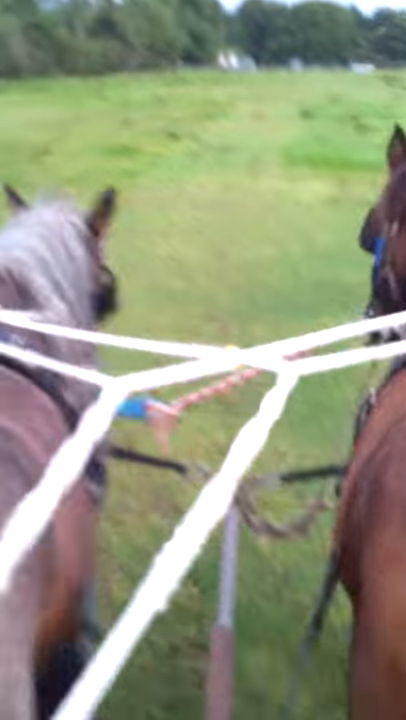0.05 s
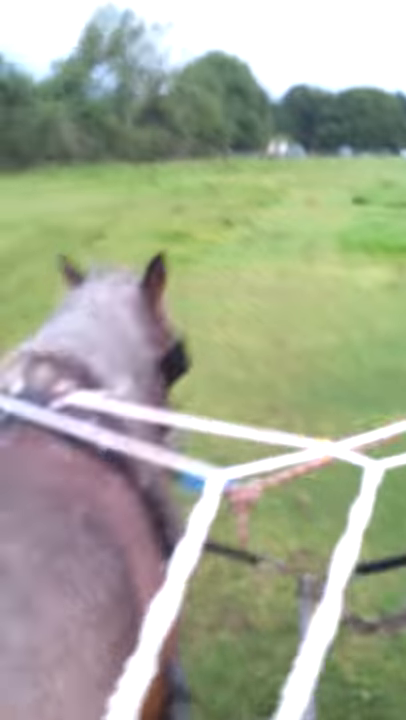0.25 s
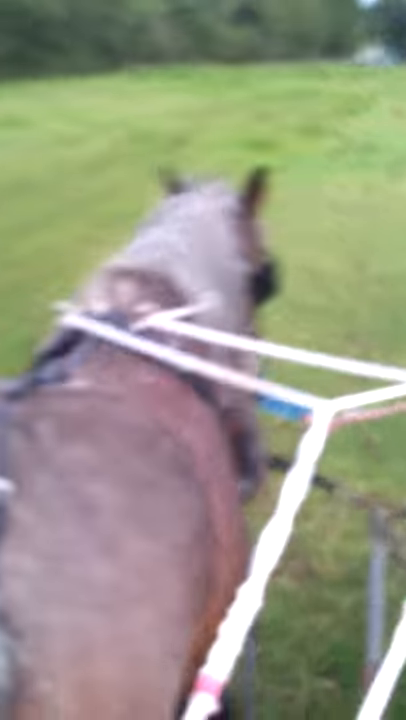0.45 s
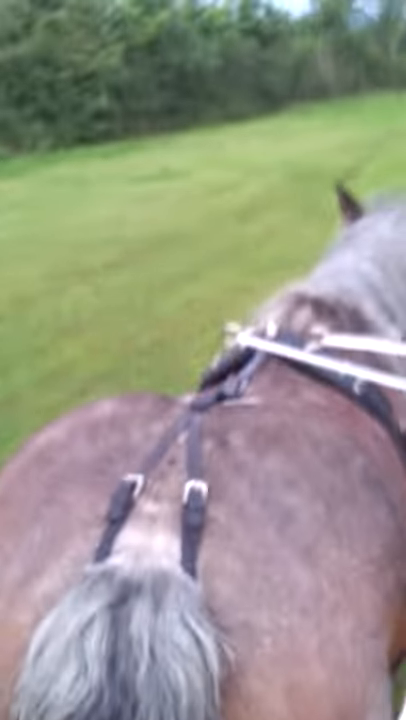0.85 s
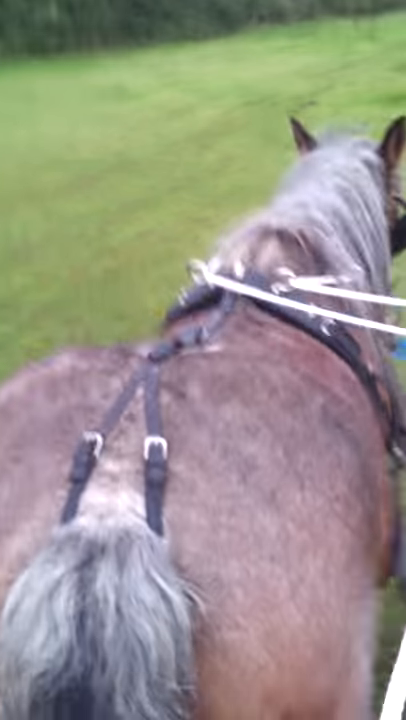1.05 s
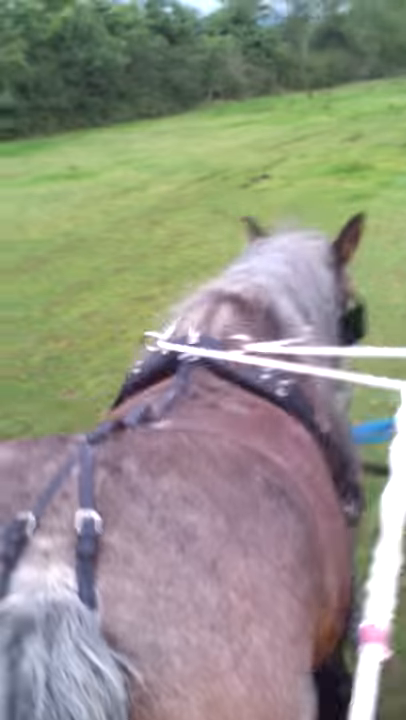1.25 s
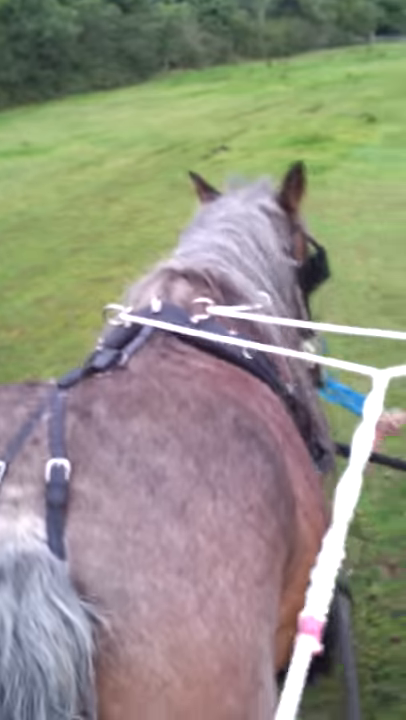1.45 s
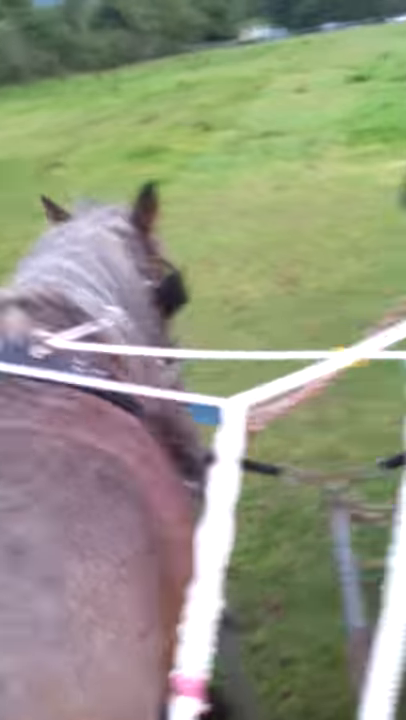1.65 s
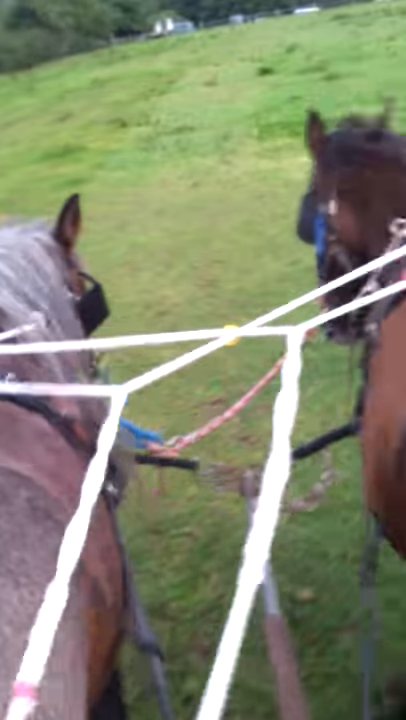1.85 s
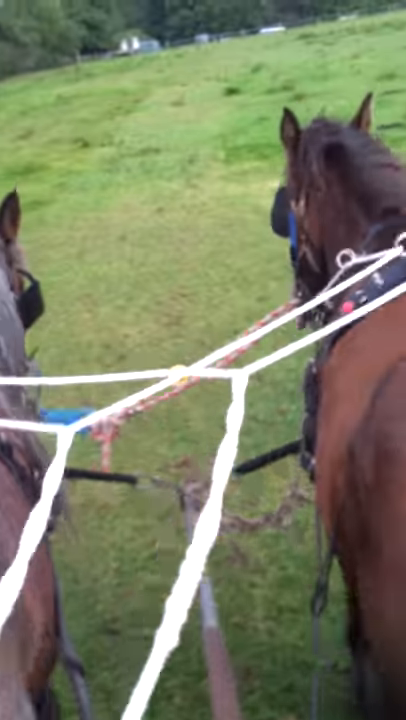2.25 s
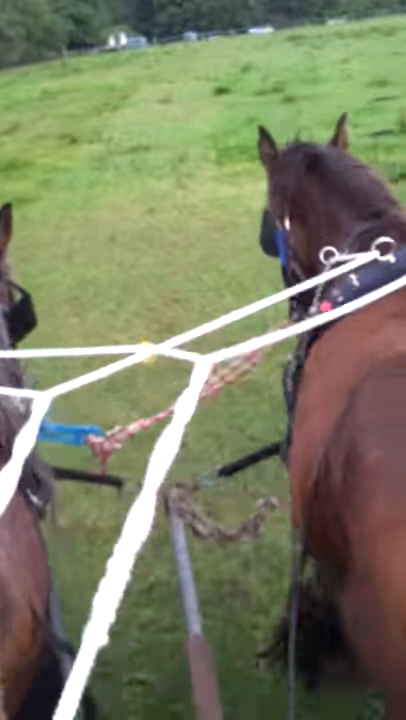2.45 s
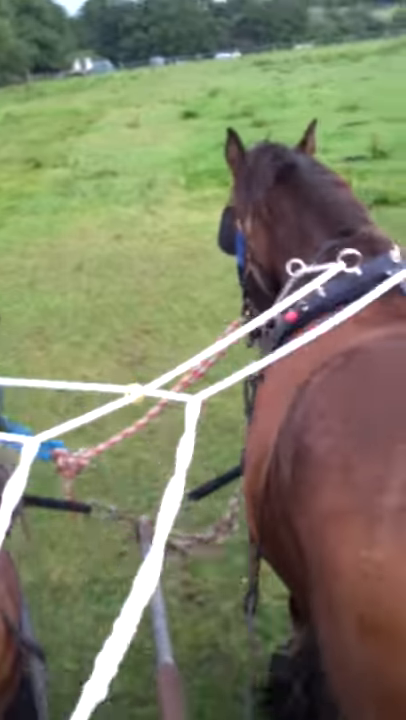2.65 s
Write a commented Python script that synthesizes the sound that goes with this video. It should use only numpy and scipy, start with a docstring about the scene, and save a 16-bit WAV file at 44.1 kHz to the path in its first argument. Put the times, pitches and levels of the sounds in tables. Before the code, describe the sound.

Horse-drawn chain harrow dragging through grass, its hitch clanking and squeaking as wind hits the microphone.

```python
"""Horses pulling a chain harrow

Two horses walk over a pasture, drawing the harrow from a steel hitch cart, heard from the seat.
The chain mat rustles through the grass, hooves thud, and impacts set the frame and links ringing.
Once a hitch joint judders and slams, overloading the microphones; later dry joints squeak
and turbulent wind buffets the port of the left microphone."""
import sys
import numpy as np
from scipy import signal
from scipy.fft import rfft, irfft, next_fast_len
from scipy.io import wavfile
from scipy.ndimage import uniform_filter1d, map_coordinates

SR = 44100
rng = np.random.default_rng(int(sys.argv[2]) if len(sys.argv) > 2 else 0)


def put_to_file(sound):
    """Save the sound as 16-bit audio at rate SR, in the file named by the first command-line argument."""
    columns = np.atleast_2d(sound).T  # one column per channel
    safe = np.clip(columns, -1, 1)
    whole_steps = np.round(safe * 32767)
    wavfile.write(sys.argv[1], SR, whole_steps.astype(np.int16))


N = 123479

# drag of the mat through the grass (t/s, level/dB)
DRAG_LEVELS = [(0.0, -32), (0.106, -36), (0.186, -32.5), (0.21, -39.5), (0.31, -34), (0.5, -37),
               (0.57, -31), (0.59, -39), (0.77, -32), (0.8, -43.5), (0.81, -33.5), (0.92, -30),
               (1.06, -36.5), (1.09, -32.5), (1.32, -29.5), (1.41, -34.5), (1.42, -30), (1.47, -37),
               (1.51, -32.5), (1.54, -38.5), (1.56, -40), (1.6, -31.5), (1.65, -38), (1.7, -33.5),
               (1.73, -35), (1.83, -30), (1.86, -35.5), (2.1, -27.5), (2.19, -35.5), (2.25, -27.5),
               (2.29, -38.5), (2.32, -28.5), (2.37, -36.5), (2.38, -26.5), (2.46, -32), (2.47, -40),
               (2.51, -29.5), (2.54, -43.5), (2.57, -32), (2.67, -40), (2.68, -33.5), (2.8, -35)]
# flicking blades (f/Hz, level/dB)
GRASS_SPECTRUM = [(300, -22), (1000, -8), (1600, -5), (2500, -10), (3400, -4), (4400, -5.5), (5600, -2.5),
                  (7000, -1.5), (9700, -8), (12000, -10.5), (13700, -16), (15000, -35)]
# stems snap and links tick (t/s, level/dB)
SNAPS = [(.6054, -37), (.7371, -25), (.8079, -27), (1.092, -32), (1.1925, -26), (1.285, -29), (1.314, -29),
         (1.424, -30), (1.4859, -29), (1.5138, -26), (1.602, -33), (1.7533, -32), (1.9348, -30),
         (2.5629, -33)]
# snaps and ticks (f/Hz, level/dB)
SNAP_SPECTRUM = [(400, -20), (1500, -11), (4000, -3), (7000, 7), (11000, 7), (14500, -9)]
# rattle of the rolling frame (t/s, level/dB)
ROLL_LEVELS = [(0.62, -48), (0.882, -42.5), (1.04, -46), (1.136, -39), (1.194, -45), (1.208, -39),
               (1.678, -44), (1.84, -38.5), (1.864, -46), (2.094, -37), (2.19, -48.5), (2.244, -35.5),
               (2.292, -41), (2.34, -37.5), (2.55, -44.5), (2.8, -45.5)]
# rolling frame (f/Hz, level/dB)
ROLL_SPECTRUM = [(50, -40), (90, -16), (170, -6.5), (270, -1), (345, 3), (450, -0.5), (640, -1.5), (760, 3),
                 (900, -2), (1150, -3.5), (1700, -11), (2600, -4), (5000, -21.5)]
# faint buffeting on both ports (t/s, level/dB)
BREEZE_LEVELS = [(0, -46.5), (.1, -50), (.25, -37), (.45, -56), (.6, -48), (1.0, -49.5), (1.3, -62),
                 (1.9, -57), (2.15, -42.5), (2.4, -58), (2.8, -46.5)]
# rumble of light air (f/Hz, level/dB)
BREEZE_SPECTRUM = [(25, -35), (60, -3.5), (140, -3), (220, -2), (500, -28), (1500, -55)]
# hoof thuds on turf (t/s, f/Hz, level/dB, left minus right/dB)
HOOF_FALLS = [(.002, 172, -37.5, -21), (.175, 198, -28.5, -13), (.285, 329.7, -17.5, 0),
              (.318, 351.6, -23, 3), (1.215, 354, -35, 0), (1.308, 346, -25.5, -2),
              (1.527, 342.5, -26.5, 2), (1.692, 259, -37, -16), (2.079, 297, -35, -8)]
# light knocks in the frame (t/s, ring level/dB, rattle level/dB)
FRAME_KNOCKS = [(.088, -38, -36), (.118, -40.5, -34), (.328, -31.5, -24.5), (.579, -38.5, -42),
                (1.125, -62, -28.5), (1.212, -43, -25.5), (1.24, -55, -46), (1.487, -40.5, -30.5),
                (2.092, -47, -48), (2.228, -48, -32), (2.241, -44, -32), (2.33, -45, -33),
                (2.435, -42, -48)]
# modes of the steel frame (f/Hz, level/dB, T60/s)
FRAME_MODES = [(387, -14, 0.38), (612.6, -7, 0.25), (630, 10.5, 0.054), (642, -10.5, 0.85), (731, -7, 0.51),
               (814, -3.5, 0.75), (848, -2, 0.41), (985, -5.5, 0.27), (1049, 4, 0.18), (1240, 2, 0.3),
               (1634, 6, 0.17), (1904, -0.5, 0.34), (2208, -22.5, 0.31), (2646, 1, 0.098),
               (2825, -10, 0.32), (2915, -13.5, 0.36), (3664, -3.5, .13), (4274, -2, 0.18), (4754, 4, 0.15)]
# tones of the slipping joint (f/Hz, level/dB, swell time/s)
JOINT_TONES = [(845, -1.5, 0.0015), (1011, 0.5, .0017), (2728, -17.5, 0.0031)]
# impacts in the hitch and frame (f/Hz, level/dB)
IMPACT_SPECTRUM = [(150, -46), (350, -11), (620, 3), (1300, 2), (2200, 0.5), (2800, -0.5), (4500, -5),
                   (7000, -7.5), (10000, -18.5), (15000, -29)]
# clatter after the slam (f/Hz, level/dB)
TAIL_SPECTRUM = [(60, -40), (170, -1.5), (330, -1.5), (500, 2), (800, 8.5), (1200, 0), (1900, -3.5),
                 (2300, -16), (2900, -8), (5000, -14), (12000, -49)]
# chain links clink (t/s, f/Hz, level/dB)
LINK_CLINKS = [(0.467, 2960, -26), (1.192, 3890, -18.5), (1.195, 3430, -28.5), (1.329, 5880, -26.5),
               (1.599, 5450, -31)]
# wind on the left port (t/s, level/dB)
WIND_LEVELS = [(0, -56.5), (.5, -47), (.6, -30), (.76, -50), (1.93, -59.5), (2.005, -22.5), (2.07, -35),
               (2.17, -24.5), (2.24, -44), (2.34, -45.5), (2.388, -15.5), (2.415, -16.5), (2.455, -16),
               (2.474, -7), (2.497, -23), (2.58, -25.5), (2.675, -26.5), (2.71, -36.5), (2.8, -48)]
# turbulence at the port (f/Hz, level/dB)
WIND_SPECTRUM = [(25, -27), (70, -22), (130, 2.5), (250, 3.5), (360, -7.5), (550, -11), (900, -24),
                 (1600, -33), (4000, -73)]
# sharp eddies that strike the port (t/s, f/Hz, level/dB)
WIND_EDDIES = [(2.0049, 413, -6.5), (2.389, 258, -4), (2.405, 343, -3), (2.439, 396, -5), (2.461, 292, 5.5),
               (2.4727, 400, 7.5), (2.4778, 261, 9), (2.488, 288, -1.5), (2.505, 443, -11.5),
               (2.524, 680, -12), (2.547, 322, -11.5), (2.601, 330, -16.5), (2.678, 288, -13.5)]
# dry joints squeak (t/s, f/Hz, level/dB, relative level of second harmonic/dB)
JOINT_CREAKS = [(1.78, 760, -33, -14), (1.83, 760, -38, -14), (2.035, 770, -34, -14),
                (2.105, 755, -35, -14), (2.243, 640, -27.5, 7.5), (2.335, 770, -35, -12),
                (2.625, 760, -35, -14)]

PORT_LAG_S, SHORT_LAG_S = 0.00033, 0.0001  # delays of the right channel
FRAME_PAN_DB = 2  # left minus right


def undb(db):
    return np.exp(np.asarray(db) * np.log(10) / 20)


def unit_rms(x):
    return x / np.sqrt(np.mean(x ** 2))


def clock():
    return np.arange(N) / SR


def envelope(rows):
    """Amplitude envelope through (t/s, level/dB) points."""
    return undb(np.interp(clock(), *np.array(rows).T))


def colour(x, spectrum):
    """Linear filtering by (f/Hz, level/dB) points, scaled to unit rms."""
    hz, db = np.array(spectrum).T
    size = next_fast_len(N, real=True)
    f = np.maximum(np.fft.rfftfreq(size, 1 / SR), 1)
    skirt = np.minimum(f / hz[0], 1) ** 2
    gain = undb(np.interp(np.log(f), np.log(hz), db))
    return unit_rms(irfft(rfft(x, size) * skirt * gain, size)[:N])


def noise(spectrum):
    return colour(rng.standard_normal(N), spectrum)


def wander(per_s):
    """Smoothed random steps give a slow fluctuation with a spread near 1."""
    hold = int(SR / per_s)
    steps = rng.standard_normal(2000)[np.arange(N) // hold]
    return 1.3 * uniform_filter1d(uniform_filter1d(steps, hold), hold)


def decay(peak_s, t60, rise_s=0.00025):
    """Exponential growth up to the peak, then exponential decay."""
    age = clock() - peak_s
    live = (age > -8 * rise_s) & (age < 2 * t60)
    out, t = np.zeros(N), age[live]
    out[live] = np.exp(np.minimum(t, 0) / rise_s - np.log(1000) * np.maximum(t, 0) / t60)
    return out


def ring(start, modes, attack_s=0.00098):
    """Free vibration of a struck body: a sum of damped modes (f/Hz, level/dB, T60/s)."""
    age = clock() - start
    live = (age > 0) & (age < 0.6)
    out, t = np.zeros(N), age[live]
    for hz, db, t60 in modes:
        out[live] += undb(db) * np.sin(2 * np.pi * hz * t) * np.exp(-np.log(1000) * t / t60)
    out[live] *= 1 - np.exp(-t / attack_s)
    return out


def sides(pan_db):
    return undb(np.array([[pan_db], [-pan_db]]) / 2)


def ports(x, pan_db=FRAME_PAN_DB, lag_s=PORT_LAG_S):
    """Path difference: the sound reaches the left microphone port first."""
    delayed = map_coordinates(x, [np.arange(N) - lag_s * SR])
    return np.array([x, delayed]) * sides(pan_db)


def grains(per_s, spread_db):
    """Shot noise: independent clicks of very unequal size."""
    clicks = (rng.random(N) < per_s / SR) * rng.standard_normal(N)
    return clicks * undb(spread_db * np.minimum(rng.exponential(size=N), 4))


def grass():
    """Shot noise of blades flicking off the jingling mat comes in surges, with a few louder snaps."""
    surge = envelope(DRAG_LEVELS) * undb(2 + 1.57 * wander(per_s=110))
    blades = np.array([colour(grains(per_s=12000, spread_db=1.5), GRASS_SPECTRUM) for _ in range(2)])
    rustle = (blades + jingle()) * surge
    bursts = sum(undb(db) * decay(s, t60=0.023) for s, db in SNAPS)
    snaps = bursts * np.array([noise(SNAP_SPECTRUM), noise(SNAP_SPECTRUM)])
    return (rustle + snaps) * sides(pan_db=4.5)


def jingle(per_s=330, median_hz=6720, spread_octaves=0.3, top_hz=14700, t60=0.042):
    """Small links, struck at random, each vibrate at their own natural frequency."""
    out, t = np.zeros((2, N + SR)), np.arange(int(t60 * SR)) / SR
    damping = np.exp(-np.log(1000) * t / t60)
    for when, pitch, size, pan, right_phase in rng.random((int(per_s * N / SR), 5)):
        octaves = spread_octaves * np.log(pitch / (1 - pitch)) / 2
        hz = min(median_hz * 2 ** octaves, top_hz)
        tone = np.sin(2 * np.pi * (hz * t + np.array([[0], [right_phase]]))) * damping
        i = int(when * N)
        out[:, i:i + len(t)] += tone * undb(-8.5 + 9.2 * size) * sides(8 * (pan - 0.5))
    return out[:, :N]


def rolling(diffuse=0.56):
    """Random impacts excite broad resonances as the frame and mat travel over the turf."""
    direct, left, right = (colour(grains(per_s=1500, spread_db=2), ROLL_SPECTRUM) for _ in range(3))
    rumble = ports(direct, lag_s=SHORT_LAG_S) + diffuse * np.array([left, right])
    return unit_rms(rumble) * envelope(ROLL_LEVELS) * undb(3 + 2 * wander(per_s=30.07))


def breeze():
    """Light air makes uncorrelated pressure fluctuations at the two ports."""
    rumble = np.array([noise(BREEZE_SPECTRUM), noise(BREEZE_SPECTRUM)])
    return envelope(BREEZE_LEVELS) * rumble * sides(pan_db=3.5)


def hooves():
    """Soft impacts on turf excite low, heavily damped modes."""
    out = 0
    for s, hz, db, pan_db in HOOF_FALLS:
        modes = [(hz, 0, 0.13), (hz * 0.457, -10, 0.08), (hz * 1.386, -5, 0.08)]
        out += undb(db) * ports(ring(s, modes, attack_s=0.0035), pan_db, SHORT_LAG_S)
    return out


def knocks(t60_ratio=0.78):
    """Loose fittings tap the frame and rattle; the point of impact sets the strength of each mode."""
    spots_db = 3 * rng.standard_normal((len(FRAME_KNOCKS), len(FRAME_MODES)))
    rings = rattle = 0
    for (s, ring_db, rattle_db), spot in zip(FRAME_KNOCKS, spots_db):
        modes = [(hz, db + shift, t60 * t60_ratio) for (hz, db, t60), shift in zip(FRAME_MODES, spot)]
        rings += undb(ring_db) * ring(s, modes)
        rattle += undb(rattle_db) * decay(s, t60=0.098, rise_s=0.0011)
    return ports(rings) + rattle * clatter(IMPACT_SPECTRUM)


def clatter(spectrum):
    """Direct and diffuse noise from the frame add in equal parts."""
    diffuse = np.array([noise(spectrum), noise(spectrum)]) * sides(FRAME_PAN_DB)
    return unit_rms(ports(noise(spectrum)) + diffuse)


def jerk(start):
    """One slip of the joint excites a transient: tones that swell and die within milliseconds."""
    age = np.maximum(clock() - start, 0)
    return sum(undb(db) * np.sin(2 * np.pi * hz * age) * (age / swell * np.exp(1 - age / swell)) ** 2
               for hz, db, swell in JOINT_TONES)


def hitch(slip_s=0.2253, gap_s=0.0051, ring_s=0.2475, slam_s=0.2509):
    """Stick-slip: the joint judders, then slams home and sets the frame and its chains ringing."""
    jerks_db = (-11, 7, 4, 1, -2, -5)
    judder = sum(undb(db) * jerk(slip_s + k * gap_s) for k, db in enumerate(jerks_db))
    ringing = undb(-12.5) * ring(ring_s, FRAME_MODES)
    slam = undb(-2.5) * decay(slam_s, t60=0.13, rise_s=0.009) * clatter(IMPACT_SPECTRUM)
    tail = undb(-17.5) * decay(slam_s, t60=0.77, rise_s=0.007) * clatter(TAIL_SPECTRUM)
    return ports(judder + ringing) + slam + tail


def links(t60=0.13):
    """Each struck link vibrates freely in a close pair of modes."""
    clinks = sum(undb(db) * ring(s, [(hz, 0, t60), (hz * 0.9, -6, t60)]) for s, hz, db in LINK_CLINKS)
    return ports(clinks, pan_db=2.5)


def wind():
    """Turbulent pressure flutters on the left port; single eddies push and then pull on it."""
    turbulence = noise(WIND_SPECTRUM) * undb(3.1 * wander(per_s=160))
    buffet = envelope(WIND_LEVELS) * unit_rms(turbulence)
    for s, hz, db in WIND_EDDIES:
        cycles = (clock() - s) * hz
        buffet -= undb(db) * np.sin(2 * np.pi * cycles) * np.exp(-(cycles / 0.72) ** 2)
    return buffet * np.array([[1], [undb(-42)]])


def creaks(waver=0.0245):
    """Dry friction in the hitch joints makes short squeaks, roughened by frequency modulation."""
    warped_time = np.cumsum(1 + waver * wander(per_s=300)) / SR
    out = 0
    for s, hz, db, second_db in JOINT_CREAKS:
        phase = 2 * np.pi * hz * warped_time
        tone = np.sin(phase) + undb(second_db) * np.sin(2 * phase)
        out += undb(db) * decay(s, t60=0.14, rise_s=0.012) * tone
    return ports(out)


def scene():
    """Superposition: the pressures of all sources add at the two microphones."""
    return grass() + rolling() + hitch() + knocks() + creaks() + links() + hooves() + breeze() + wind()


def record(dry):
    """Saturation: the microphones overload at full scale; a low-pass filter cuts the top."""
    clipped = dry / (1 + dry ** 8) ** (1 / 8)
    low_pass = signal.ellip(8, 0.2, 70, 14700, fs=SR, output="sos")
    return signal.sosfilt(low_pass, clipped)


dry = scene()
out = record(dry)
put_to_file(out)
```